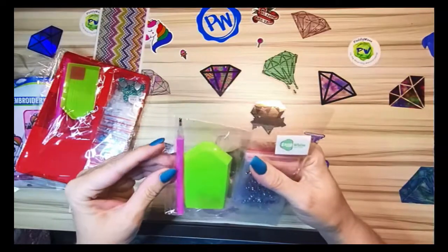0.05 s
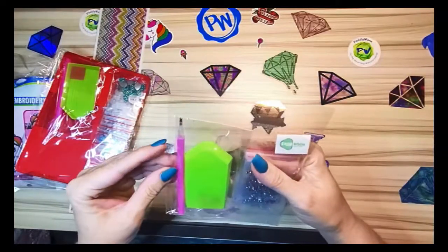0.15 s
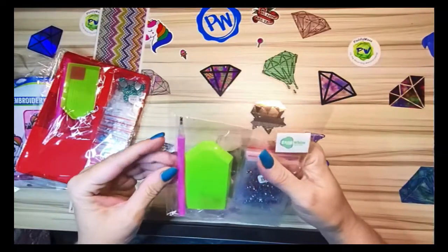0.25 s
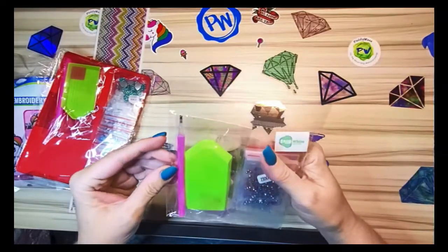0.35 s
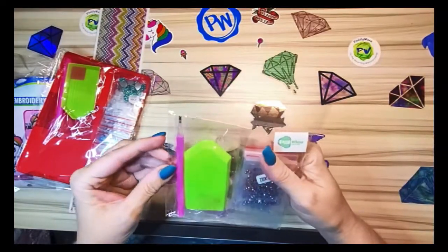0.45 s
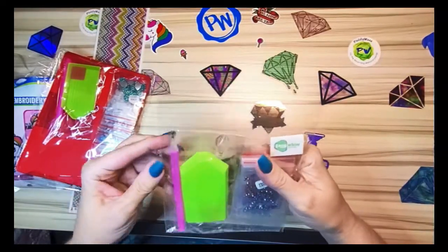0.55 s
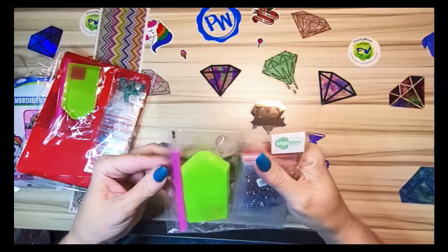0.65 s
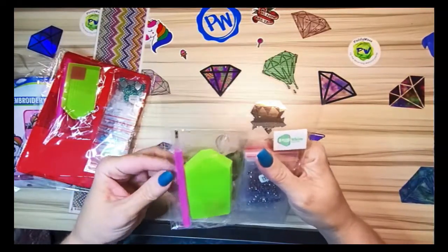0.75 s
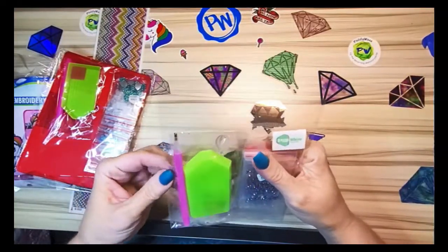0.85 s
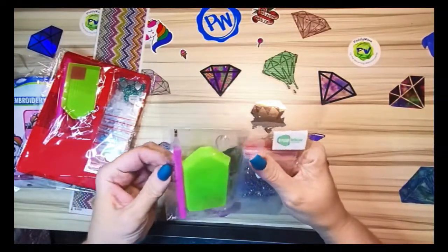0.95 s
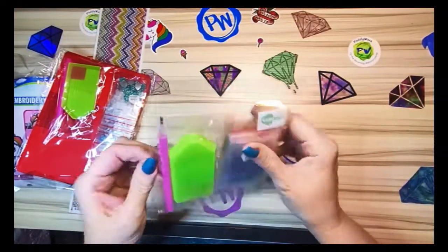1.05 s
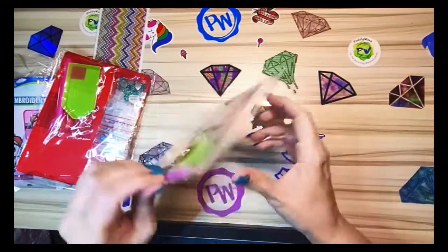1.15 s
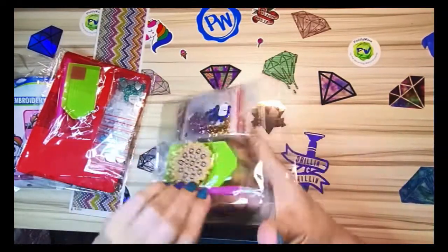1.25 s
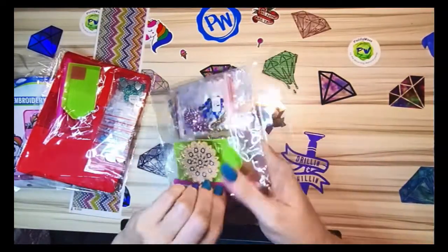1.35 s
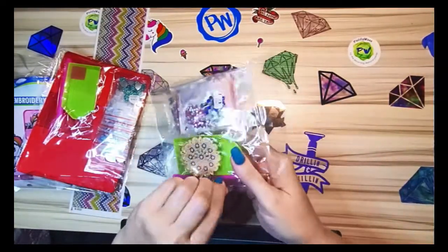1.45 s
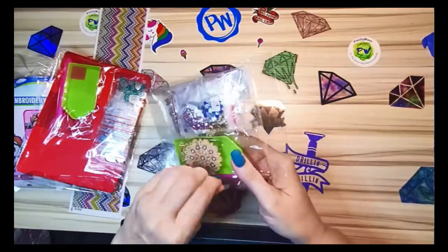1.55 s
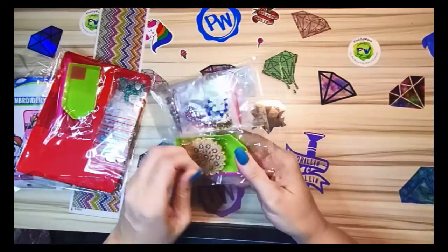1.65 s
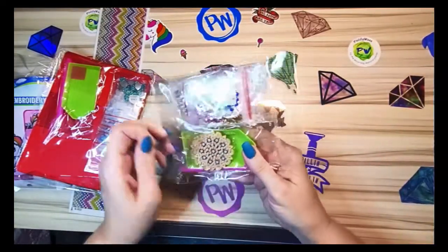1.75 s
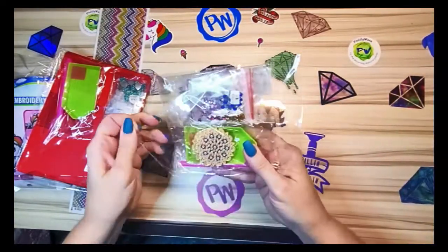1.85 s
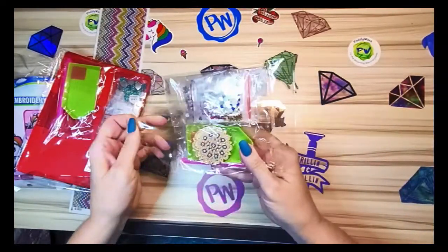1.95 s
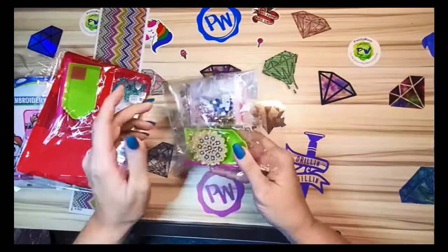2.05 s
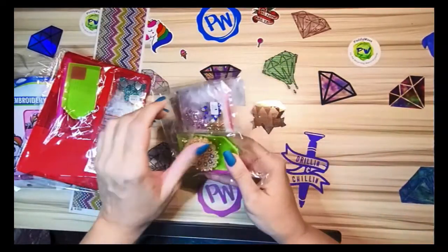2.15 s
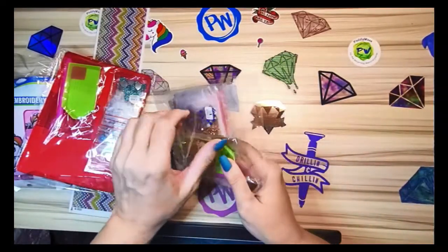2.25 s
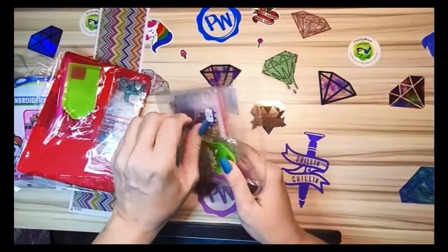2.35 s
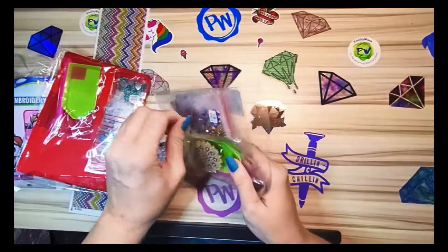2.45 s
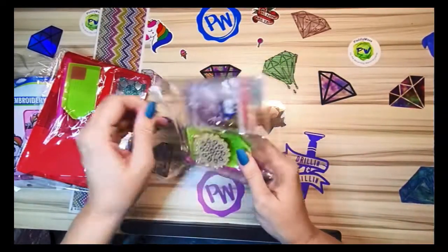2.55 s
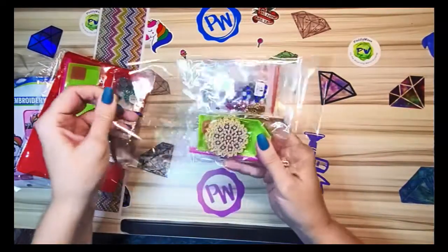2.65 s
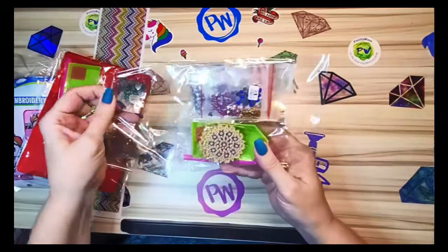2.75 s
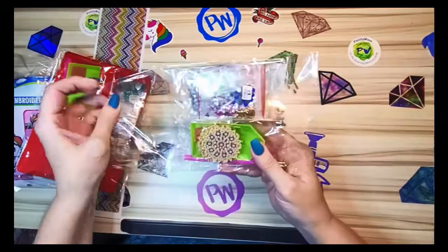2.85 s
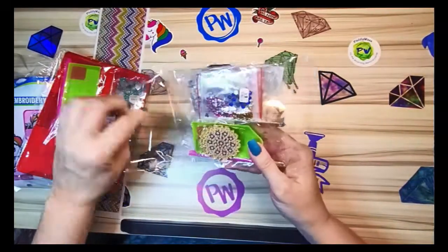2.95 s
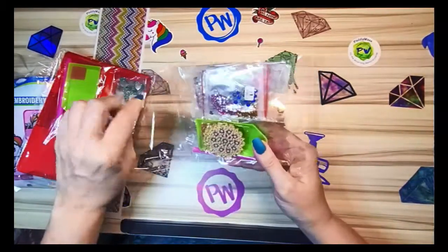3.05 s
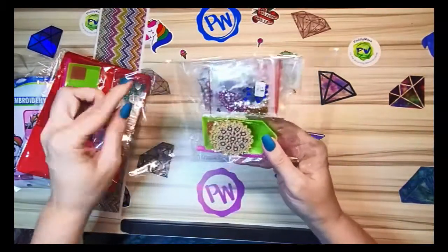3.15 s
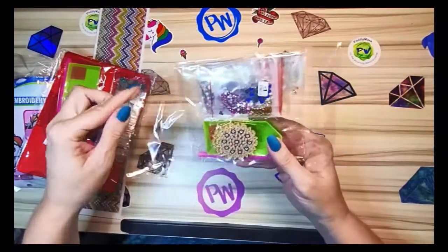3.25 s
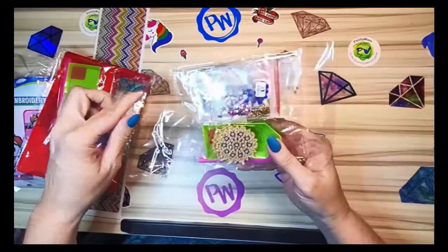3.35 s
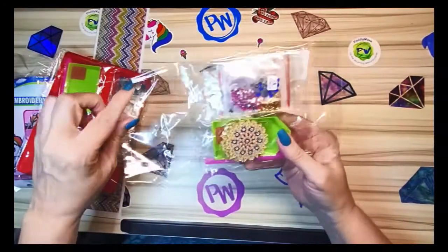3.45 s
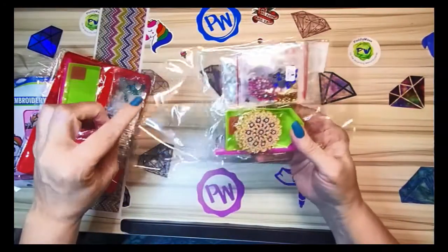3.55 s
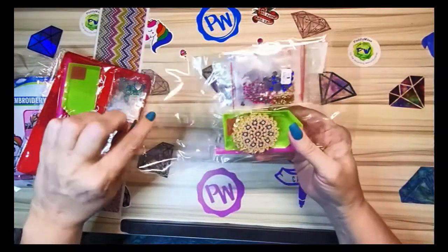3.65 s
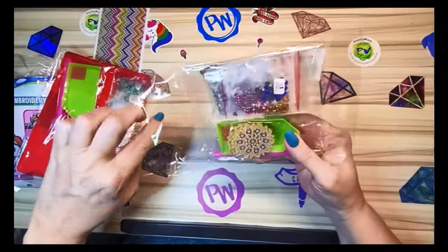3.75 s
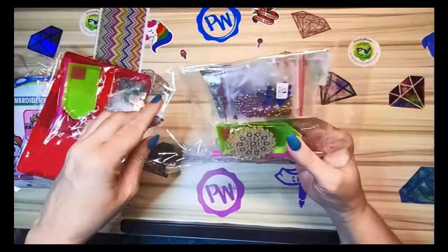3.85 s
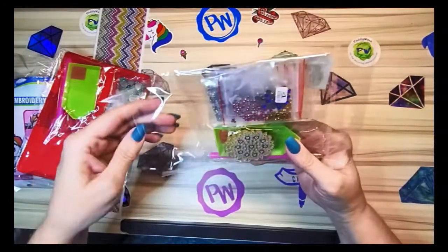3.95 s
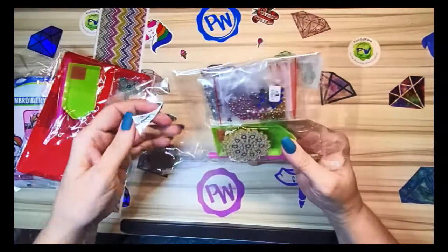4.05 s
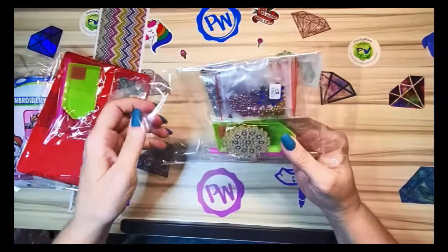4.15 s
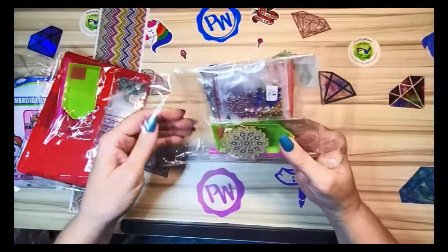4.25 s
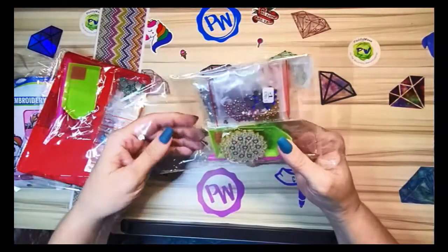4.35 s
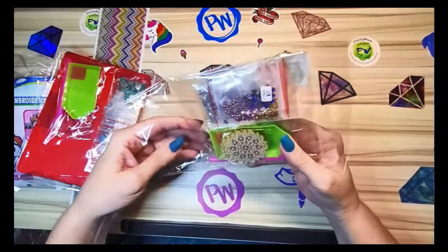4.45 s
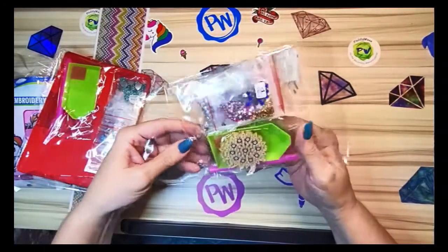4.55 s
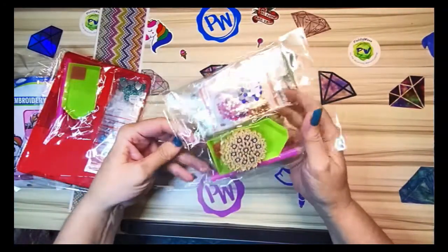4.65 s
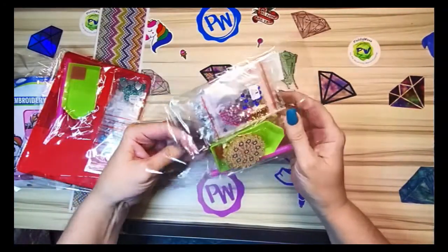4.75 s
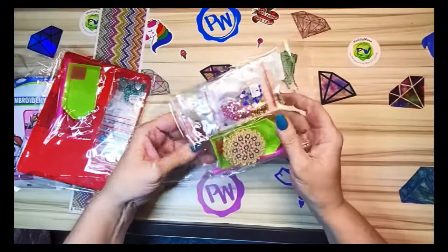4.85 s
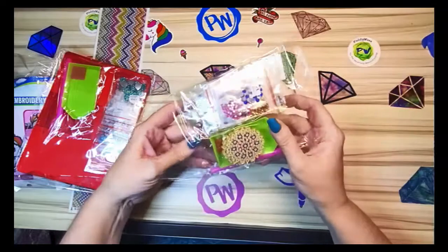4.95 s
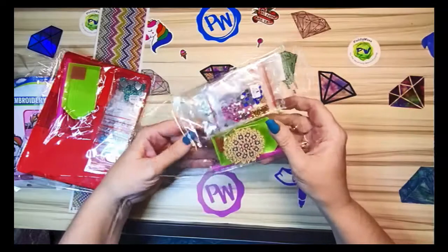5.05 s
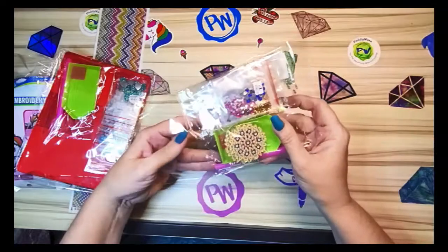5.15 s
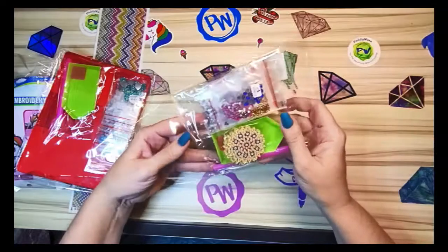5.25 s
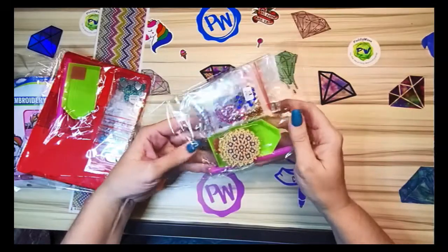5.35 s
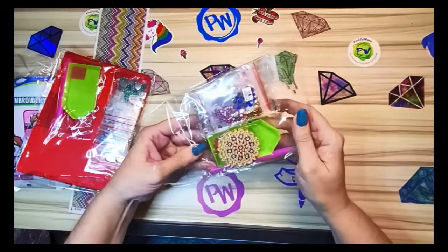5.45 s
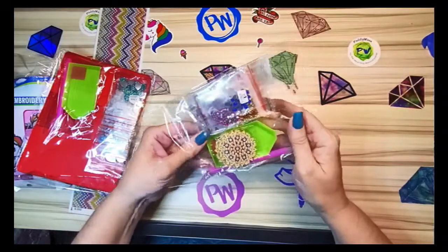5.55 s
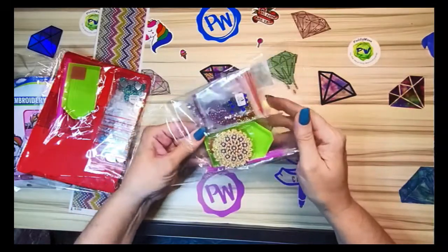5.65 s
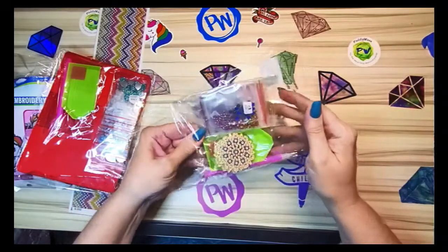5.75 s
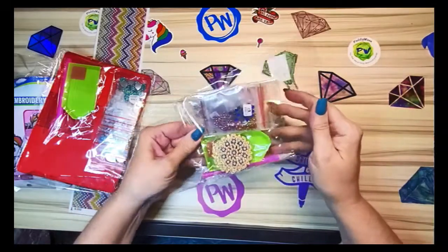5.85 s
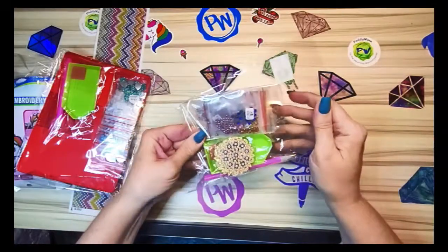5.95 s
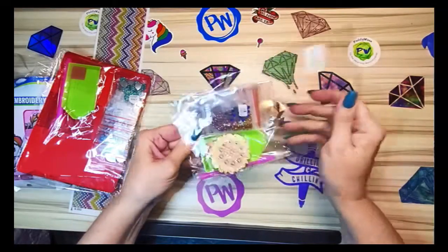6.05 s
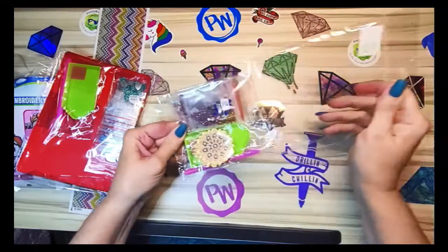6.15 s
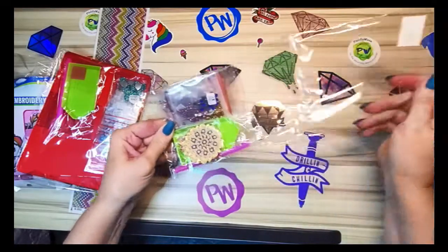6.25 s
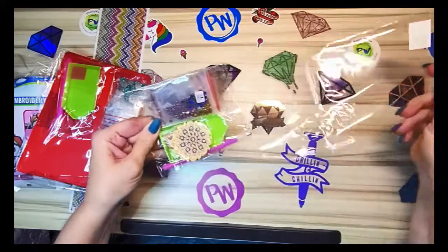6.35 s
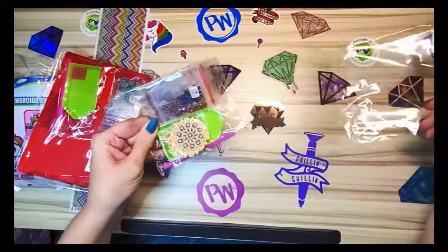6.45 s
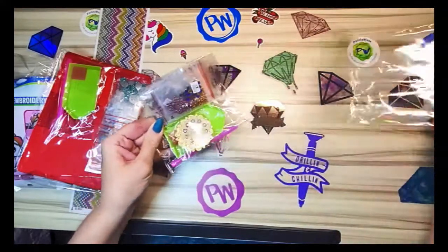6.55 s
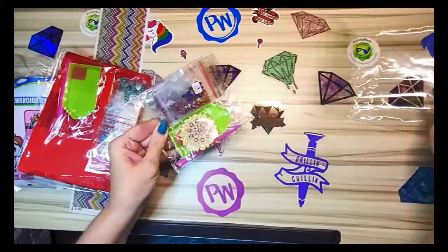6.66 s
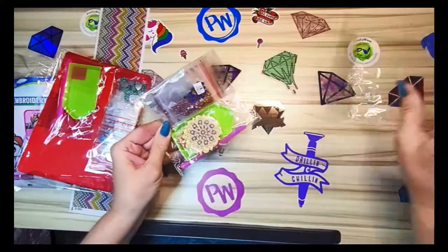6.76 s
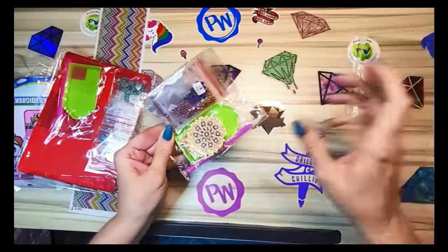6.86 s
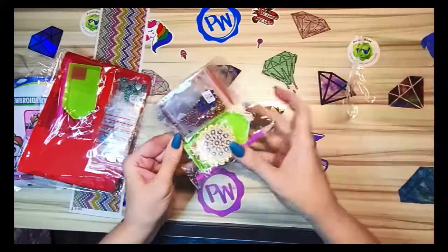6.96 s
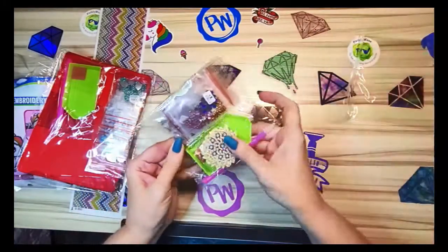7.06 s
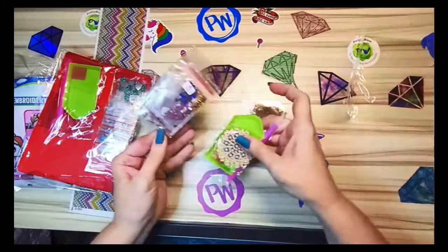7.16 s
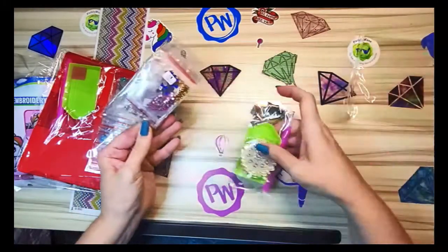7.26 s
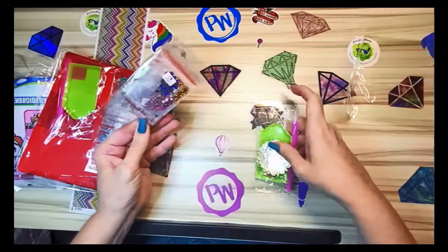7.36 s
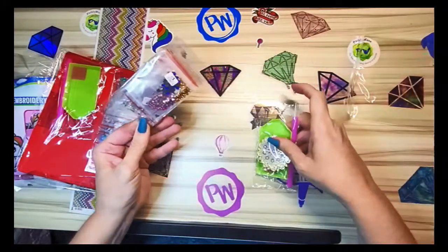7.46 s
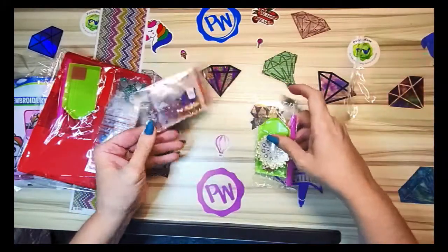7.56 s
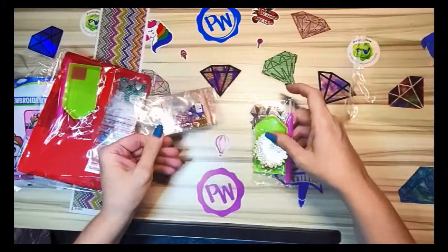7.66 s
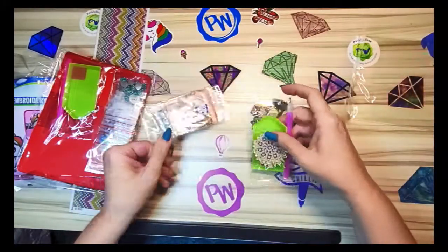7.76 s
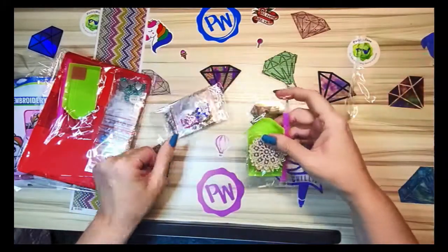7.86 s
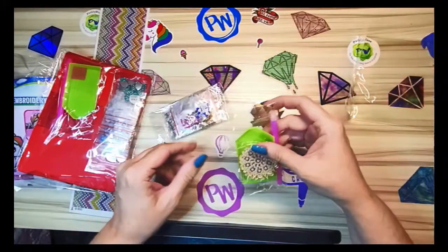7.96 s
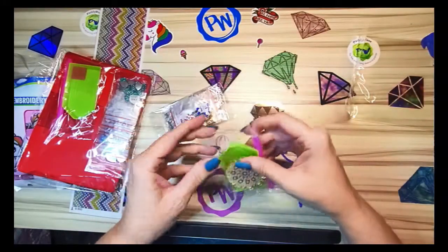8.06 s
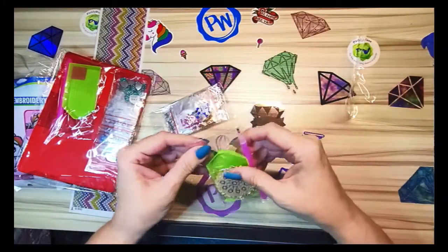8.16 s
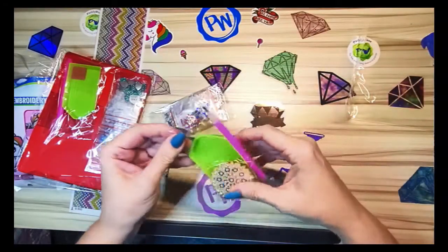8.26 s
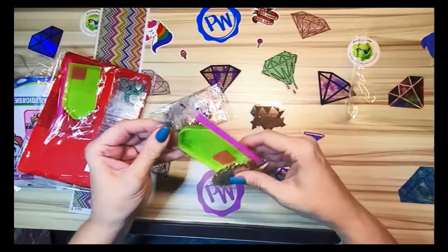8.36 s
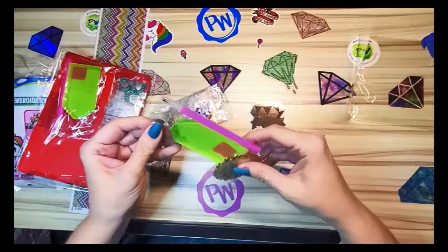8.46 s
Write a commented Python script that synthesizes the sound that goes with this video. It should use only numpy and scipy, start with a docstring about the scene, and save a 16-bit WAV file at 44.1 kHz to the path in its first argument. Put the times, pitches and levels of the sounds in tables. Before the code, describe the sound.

Bright, dry plastic crinkling heard from near the hands: single sharp pops over fine crackle and a low flutter of film. A sticky flap unpeels early in a short buzzy rip. The rustling grows almost continuous, drops away, then returns in shorter bursts with a light thud on the desk. Faint room rumble, hiss and hum lie behind.

```python
"""In a quiet room, hands unpack small craft packets over a desk, heard close up.
Creases in stiff plastic film flip as short noisy pops: sharp single snaps over a dense finer crackle and a low flutter.
An adhesive flap peels open in a quick run of slips, and soft knocks shake the modes of the desk top.
Film and flap excite noise-tail reflections; coloured noise, steady hum tones and one swelling low tone lie behind."""
import sys
import numpy as np
from scipy import signal
from scipy.fft import rfft, irfft
from scipy.io import wavfile
from scipy.ndimage import uniform_filter1d, minimum_filter1d

SR = 44100
rng = np.random.default_rng(int(sys.argv[2]) if len(sys.argv) > 2 else 0)


def dump(signal):
    """Clip the signal to [-1, 1] and save it as 16-bit WAV at the path in sys.argv[1]."""
    limited = np.clip(np.atleast_2d(signal).T, -1, 1)
    pcm = np.round(limited * 32767).astype(np.int16)
    wavfile.write(sys.argv[1], SR, pcm)


N = 374850
TIME = np.arange(N) / SR

# Larger creases that flip one by one. Each row: time in seconds, level in dB over 3 ms before a common trim,
# body (bass against treble) in dB before a common thinning.
CREASE_SNAPS = [(0.2604, -17, -2), (0.3229, -33, 8), (0.4503, -24, -3), (0.4675, -23, 2), (0.5245, -22, 6),
                (0.5351, -22, 0), (0.573, -19, 5), (0.725, -20, -1), (0.7605, -19, 1), (0.7906, -17, 1),
                (0.8062, -17, -7), (0.8445, -24, 7), (0.8874, -23, 4), (0.9619, -16, -4), (0.9727, -12, -5),
                (1.0537, -20, -2), (1.121, -32, 5), (1.1869, -25, 1), (1.2246, -20, -3), (1.2399, -8, -10),
                (1.2565, -17, 2), (1.3005, -18, 2), (1.3423, -13, -1), (1.3637, -12, -3), (1.38, -16, 3),
                (1.39, -14, 3), (1.4273, -18, 0), (1.457, -15, 2), (1.4697, -9, 2), (1.4863, -12, -5),
                (1.511, -14, -6), (1.5248, -13, -2), (1.5367, -15, -9), (1.9325, -20, -3),
                (1.9359, -12, -4), (1.9635, -15, -3), (1.9947, -19, -2), (2.0913, -33, -5),
                (2.1402, -27, -3), (2.1656, -21, -7), (2.1876, -24, -8), (2.1942, -27, -2),
                (2.2286, -23, -3), (2.2713, -27, -6), (2.2774, -20, -5), (2.3675, -27, -1),
                (2.3795, -28, 2), (2.4048, -16, 3), (2.4145, -16, -2), (2.4211, -19, 5), (2.4695, -10, -2),
                (2.4753, -8, 2), (2.4864, -12, -4), (2.4958, -11, -6), (2.5031, -9, -6), (2.5721, -11, -2),
                (2.592, -12, -3), (2.632, -18, 3), (2.7036, -17, 0), (2.7367, -16, 1), (2.8086, -12, 0),
                (2.8492, -22, -2), (2.8777, -14, -3), (2.9062, -13, -4), (2.9265, -13, 7), (2.9484, -16, 3),
                (2.9988, -12, 0), (3.0098, -15, 4), (3.0312, -17, 2), (3.0458, -16, -7), (3.108, -13, 1),
                (3.166, -20, 6), (3.2261, -17, 1), (3.2594, -13, -3), (3.3785, -13, 2), (3.5031, -18, 0),
                (3.714, -30, -8), (3.7906, -22, -5), (3.806, -18, -1), (3.8484, -14, 0), (3.8788, -18, 4),
                (3.9366, -11, 0), (3.9682, -17, -9), (4.0177, -10, 2), (4.1639, -26, -5), (4.2127, -13, -2),
                (4.253, -14, 4), (4.2697, -17, 4), (4.2916, -13, 1), (4.3166, -13, 1), (4.3701, -16, -4),
                (4.4103, -20, 0), (4.447, -11, 2), (4.4992, -11, -7), (4.5122, -11, -1), (4.5521, -14, -10),
                (4.575, -10, -2), (4.6272, -12, 0), (4.6323, -11, -3), (4.6688, -11, 2), (4.7114, -12, 2),
                (4.7268, -11, 3), (4.7611, -9, 2), (4.7702, -12, -3), (4.8106, -13, 0), (4.872, -10, 8),
                (4.938, -10, 1), (4.9503, -13, -1), (4.9761, -10, -2), (5.0035, -10, -1), (5.0376, -12, -3),
                (5.0515, -11, -3), (5.0786, -14, 1), (5.1489, -15, 2), (5.1734, -11, 0), (5.1884, -12, -1),
                (5.244, -16, 2), (5.3078, -15, -3), (5.3197, -10, -10), (5.3565, -13, -2), (5.3925, -14, 0),
                (5.4068, -15, -2), (5.4585, -19, -2), (5.4932, -16, 6), (5.5568, -12, 2), (5.5615, -14, -1),
                (5.5957, -10, -7), (5.6243, -11, -1), (5.6343, -13, 2), (5.665, -12, -12), (5.6757, -10, 2),
                (5.8319, -15, 2), (5.9007, -17, -1), (5.9639, -15, -4), (6.0019, -12, 0), (6.0248, -13, 1),
                (6.039, -11, 2), (6.0665, -12, -1), (6.1181, -15, 3), (6.1299, -14, -4), (6.1429, -11, -2),
                (6.2412, -14, -5), (6.2583, -17, -8), (6.2834, -17, 1), (6.302, -13, -6),
                (6.3491, -12, -12), (6.3619, -15, -14), (6.3674, -12, -11), (6.3788, -12, -8),
                (6.5013, -18, -11), (6.5127, -24, -8), (6.5635, -14, -2), (6.6643, -28, 8),
                (6.9452, -19, -8), (7.0129, -15, -7), (7.0279, -14, 6), (7.0559, -12, -2),
                (7.0607, -12, -6), (7.1947, -17, -7), (7.2421, -21, -10), (7.2832, -20, -2),
                (7.3253, -15, 0), (7.3315, -15, -2), (7.3395, -12, -3), (7.4179, -23, 5), (7.4675, -20, 0),
                (7.4758, -20, -5), (7.4968, -16, -2), (7.5971, -21, 4), (7.6422, -18, 2), (7.6534, -19, 1),
                (7.6996, -15, -4), (7.7353, -24, 16), (7.7589, -16, 2), (7.8026, -20, 3), (8.0618, -22, 1),
                (8.0718, -22, -8), (8.1208, -10, -1), (8.186, -16, -2), (8.2266, -10, -12),
                (8.2603, -17, -9), (8.2934, -13, -7), (8.314, -14, 2), (8.3438, -13, -6), (8.4056, -14, -4),
                (8.4134, -16, -7), (8.4925, -19, 4)]
# Finger moves that bend the film. Each row: start in seconds, hold in seconds, fine crackle in dB,
# low flutter of the whole sheet in dB, both before a common trim.
FILM_BENDS = [(0.0, 0.0043, -37, -57), (0.275, 0.005, -40, -55), (0.447, 0.008, -33, -51),
              (0.522, 0.061, -31, -48), (0.594, 0.084, -38.5, -56.5), (0.726, 0.13, -30, -49.5),
              (0.955, 0.052, -27, -44.5), (1.24, 0.056, -25, -37.5), (1.344, 0.14, -25, -45.5),
              (1.558, 0.29, -27, -54), (1.952, 0.022, -22.5, -49.5), (2.125, 0.2, -40, -72.5),
              (2.425, 0.044, -26.5, -55), (2.466, 0.14, -20, -41), (2.676, 0.18, -31, -53),
              (2.903, 0.0372, -21, -36), (3.006, 0.11, -26, -44.5), (3.161, 0.13, -30, -47.5),
              (3.389, 0.0042, -24, -36), (3.441, 0.14, -32, -52), (3.744, 0.085, -33, -48),
              (3.859, 0.093, -28, -47.5), (3.989, 0.11, -31.5, -47.5), (4.224, 0.12, -26, -42),
              (4.424, 0.16, -23, -40), (4.59, 0.2, -17, -40), (4.807, 0.28, -20, -39),
              (5.131, 0.14, -23, -40), (5.307, 0.135, -21, -45.5), (5.498, 0.15, -23, -55),
              (5.667, 0.056, -16, -41), (5.771, 0.23, -22, -47), (6.005, 0.1734, -20, -43),
              (6.256, 0.067, -24, -52.5), (6.372, 0.021, -19.5, -63), (6.444, 0.087, -35.5, -55),
              (6.551, 0.035, -25.5, -42), (6.627, 0.054, -41, -72), (6.843, 0.074, -53, -76),
              (6.97, 0.048, -29.5, -61), (7.022, 0.073, -25, -48), (7.226, 0.064, -34, -72),
              (7.331, 0.0018, -25.5, -64.5), (7.482, 0.0092, -27, -75), (7.616, 0.17, -28, -50.5),
              (8.119, 0.061, -22, -41.5), (8.244, 0.2, -25.5, -60), (8.489, 0.023, -42, -63.5)]
# Peeling the flap. Each row: time in seconds, slips per second, level in dB, body (bass against treble) in dB.
FLAP_PEEL = [(1.545, 200, -23, -6), (1.562, 300, -16, 0.5), (1.585, 400, -11.5, 1.5), (1.63, 380, -17, 1.5),
             (1.66, 400, -14.5, -4.5), (1.73, 240, -16, -2.5), (1.785, 520, -12.5, 2.5),
             (1.83, 400, -28, -14)]
# Soft knocks on the desk. Each row: time in seconds, level in dB, dullness in dB per octave.
DESK_KNOCKS = [(1.21, -47, 11), (2.225, -54, 1), (4.507, -46.5, 15), (7.801, -31.5, 2), (7.9, -50, 7)]
# Modes of the desk top. Each row: frequency in Hz, relative level in dB, 60 dB decay time in seconds.
DESK_MODES = [(91.04, -6, 0.097), (187, 3, 0.12), (271, -11, .1), (363, -4, 0.1)]
# Relative spectrum of a film crease. Each row: frequency in Hz, level in dB per Hz.
FILM_SPECTRUM = [(80, -34), (280, -25), (520, -11.5), (1400, -11), (3100, -6.5), (4300, -7.5), (6000, 0.5),
                 (7800, 1.5), (11300, -13.5), (15500, -33.5)]
# Relative spectrum of a slip of the flap. Each row: frequency in Hz, level in dB per Hz.
FLAP_SPECTRUM = [(200, -37.5), (600, -14), (1300, -21), (2300, -14), (3000, -7.5), (4400, -12), (7600, 0.5),
                 (10600, -10.5), (15500, -31)]
# Relative spectrum of the whole sheet. Each row: frequency in Hz, level in dB per Hz.
SHEET_SPECTRUM = [(50, -19.5), (280, -15.5), (550, -3), (900, -5), (2500, -16.5)]
# Relative spectrum of the room's rumble and hiss. Each row: frequency in Hz, level in dB per Hz.
ROOM_SPECTRUM = [(30, -17.5), (125, -8.5), (200, -12.5), (400, -9.5), (1200, -21), (3000, -18.5),
                 (8200, -15), (15000, -57)]
# Faint steady hum in the room. Each row: frequency in Hz, rms level in dB.
HUM_TONES = [(129, -72.5), (262, -69.5), (694, -72)]

# every bend takes up the slack quickly, is held, then the film relaxes
TAKE_UP_DB_PER_S, RELAX_DB_PER_S = 741, 310
CREASE_RING_S = 0.0021
ROOM_TONE_DB = -57.5  # rms
CUTOFF_HZ = 16000


def snaps(gain_db=0.5, thin_db=-1.5):
    """The larger creases flip one by one, each with its own weight of bass."""
    s, level_db, body_db = np.transpose(CREASE_SNAPS)
    shapes = pops(FILM_SPECTRUM, body_db + thin_db, ring_s=CREASE_RING_S, ring_db=-13, facet_hz=5510, facet_db=7.5)
    # a pop has energy 1: spread over 3 ms, this gives the level its meaning
    span = 0.003 * SR
    strength = np.sqrt(span) * from_db(level_db + gain_db)
    return place(np.round(s * SR).astype(int), shapes * strength[:, None])


def crinkle(crackle_db=-1.0, flutter_db=5.5):
    """Many small creases crackle as the film bends, over the low flutter of the whole sheet."""
    fine_db, sheet_db = handling()
    # harder handling buckles more creases a second
    fine_per_s = 520 * from_db(0.35 * (fine_db + 25))
    fine_clicks = tiny_buckles(fine_per_s, spread_db=5.2, even_s=0.035)
    flops = tiny_buckles(per_s=260, spread_db=7.0, even_s=0.042)
    fine_body_db = rng.normal(-4.5, 5.4, size=400)
    fine = pops(FILM_SPECTRUM, fine_body_db, ring_s=CREASE_RING_S, ring_db=-9.5, facet_hz=4800, facet_db=8.5)
    sheet_body_db = rng.normal(0, 1, size=200)
    sheet = pops(SHEET_SPECTRUM, sheet_body_db, ring_s=0.0029, ring_db=-10.0, facet_hz=730, facet_db=11)
    crackle = from_db(fine_db + crackle_db) * deal(fine_clicks, fine)
    flutter = from_db(sheet_db + flutter_db) * deal(flops, sheet)
    return crackle + flutter


def handling():
    """Crackle and flutter levels in dB: each bend rises, holds and relaxes; the strongest one leads."""
    t = TIME[::32]
    start, hold, fine_db, sheet_db = np.transpose(FILM_BENDS)[:, :, None]
    rise_db = TAKE_UP_DB_PER_S * np.maximum(start - t, 0)
    relax_db = RELAX_DB_PER_S * np.maximum(t - start - hold, 0)
    fade_db = rise_db + relax_db
    return [np.interp(TIME, t, np.max(db - fade_db, axis=0)) for db in (fine_db, sheet_db)]


def tiny_buckles(per_s, spread_db, even_s):
    """Creases give at random moments with uneven force, their power kept near 1 over a short while."""
    struck = rng.random(N) < per_s / SR
    clicks = struck * from_db(spread_db * np.clip(rng.standard_normal(N), -2, 2))
    width = int(even_s * SR)
    power = uniform_filter1d(uniform_filter1d(clicks ** 2, width), width)
    return clicks / np.sqrt(np.abs(power) + 1e-9)


def peel(jitter=0.25, uneven_db=2.0):
    """The glue holds and lets go in a nearly regular run of slips whose rate, level and body shift."""
    per_s, level_db, body_db = in_time(FLAP_PEEL)
    peeling = (TIME > FLAP_PEEL[0][0]) & (TIME < FLAP_PEEL[-1][0])
    progress = np.cumsum(per_s * peeling) / SR  # counted in slips
    chance = rng.standard_normal(size=(256, 2))
    marks = np.cumsum(np.exp(jitter * chance[:, 0]))
    at = np.searchsorted(progress, marks[marks < progress[-1]])
    # fewer slips a second carry more energy each, so the level holds
    strength = from_db(level_db[at] + uneven_db * chance[:len(at), 1]) * np.sqrt(SR / per_s[at])
    slips = pops(FLAP_SPECTRUM, body_db[at], ring_s=0.0017, ring_db=-10.0, facet_hz=6440, facet_db=-5, body_hz=5600)
    return place(at, strength[:, None] * slips)


def pops(spectrum, body_db, ring_s, ring_db, facet_hz, facet_db, body_hz=3000, flip_s=0.0003, size=512):
    """One pop a row, energy 1: a facet starts to give, flips with a sharp kick, then shivers for a moment."""
    t, hz = np.arange(size) / SR, np.fft.rfftfreq(size, 1 / SR)
    chance = rng.standard_normal((len(body_db), size))
    shiver = from_db(ring_db + 2.3 * chance[:, :1]) * chance * np.exp(-t / ring_s)
    kick = (np.arange(size) == int(flip_s * SR)) * np.sign(chance[:, 1:2])
    # every facet has two broad resonances and a hollow of its own; a negative facet_db swaps peaks and dips
    octaves = np.log2((hz + 1) / facet_hz)
    offsets = 0.8 * chance.T[2:5, :, None]
    first, second, hollow = np.exp(-((octaves - offsets) / 0.33) ** 2)
    facet = np.maximum(first, second) - hollow
    # large facets push more bass
    body = np.asarray(body_db)[:, None] / (1 + (hz / body_hz) ** 4)
    colour_db = at_hz(spectrum, hz) + facet_db * facet + body
    return rms_one(coloured(kick + shiver, colour_db)) / np.sqrt(size)


def desk(settle_s=0.019):
    """A packet lands unevenly, shaking the desk top's modes while it settles."""
    out, t = np.zeros(N), TIME[:SR // 2]
    reference_hz = DESK_MODES[1][0]
    for s, level_db, dull_db in DESK_KNOCKS:
        at = round(s * SR)
        force = rng.standard_normal(len(t)) * np.exp(-t / settle_s)
        for hz, db, t60 in DESK_MODES:
            mode = np.exp(-np.log(1000) * t / t60) * np.cos(2 * np.pi * hz * t)
            ringing = signal.fftconvolve(force, mode)[:len(t)]
            # a dull knock tilts the modes down toward the treble
            mode_db = level_db + db - dull_db * np.log2(hz / reference_hz)
            out[at:at + len(t)] += from_db(mode_db) * ringing / np.abs(ringing).max()
    return out


def room(x, t60=0.18, wet_db=-9.0, first_s=0.0064, count=6):
    """A small furnished room: dense decaying reflections that change as the hands move from place to place."""
    t = TIME[:SR // 4]
    decay = np.exp(-np.log(1000) * t / t60)
    build_up = np.clip(t / first_s, 0, 1) ** 2
    tails = rng.standard_normal((count, len(t))) * decay * build_up
    tails = from_db(wet_db) * rms_one(tails) / np.sqrt(len(t))
    # one place fades into the next, all of them in turn every 2 s
    turn = TIME / 2 + np.arange(count)[:, None] / count
    nearness = np.maximum(np.cos(2 * np.pi * turn), 0) ** 2
    nearness /= np.linalg.norm(nearness, axis=0)
    return x + signal.fftconvolve(x * nearness, tails, axes=1).sum(axis=0)[:N]


def room_tone():
    """Faint steady rumble and hiss from coloured noise, with pure tones as hum."""
    hz = np.fft.rfftfreq(N, 1 / SR)
    hum = sum(from_db(db) * np.sqrt(2) * np.sin(2 * np.pi * tone_hz * TIME) for tone_hz, db in HUM_TONES)
    noise = rms_one(coloured(rng.standard_normal(N), at_hz(ROOM_SPECTRUM, hz)))
    return hum + from_db(ROOM_TONE_DB) * noise


def low_tone(hz=258, level_db=-58, peak_s=0.9, width_s=0.11):
    """A faint low sine swells and fades once in the background."""
    swell = np.exp(-((TIME - peak_s) / width_s) ** 2)
    return from_db(level_db) * np.sqrt(2) * np.sin(2 * np.pi * hz * TIME) * swell


def from_db(db):
    """Decibels to gain."""
    return 10 ** (np.asarray(db) / 20)


def rms_one(x):
    """Scale to rms 1 along time."""
    return x / np.sqrt(np.mean(x ** 2, axis=-1, keepdims=True) + 1e-20)


def in_time(rows):
    """Each column of a curve at every sample."""
    s, *columns = np.transpose(rows)
    return [np.interp(TIME, s, c) for c in columns]


def at_hz(points, hz):
    """Read a spectrum in dB on a log-frequency axis."""
    knots, db = np.transpose(points)
    return np.interp(np.log(hz + 1), np.log(knots), db)


def coloured(x, db):
    """Causal (minimum-phase) filter with the given dB at each frequency bin."""
    size = x.shape[-1]
    cepstrum = irfft(np.log(from_db(db)), size)
    # folding the cepstrum forward in time makes the filter causal
    cepstrum[..., 1:size // 2] *= 2
    cepstrum[..., size // 2 + 1:] = 0
    return irfft(rfft(x) * np.exp(rfft(cepstrum)), size)


def deal(clicks, shapes):
    """Every click plays one of the pops, picked at random."""
    at = np.flatnonzero(clicks)
    picked = shapes[rng.integers(0, len(shapes), len(at))]
    return place(at, clicks[at, None] * picked)


def place(at, played):
    """Add each row of sound at its own sample."""
    samples = at[:, None] + np.arange(played.shape[1])
    return np.bincount(samples.ravel(), played.ravel(), N)[:N]


def scene():
    """Film and flap sound in the room; the desk, room tone and low tone are added without reflections."""
    handled = room(snaps() + crinkle() + peel())
    return (handled + desk() + room_tone() + low_tone())[None]


def record(dry):
    """A fast limiter eases down peaks above full scale, then a steep low-pass cuts the top."""
    needed = 1 / np.maximum(np.abs(dry), 1)
    gain = uniform_filter1d(minimum_filter1d(needed, size=25), size=25)
    low_pass = signal.ellip(10, 0.2, 80, CUTOFF_HZ, fs=SR, output="sos")
    return signal.sosfilt(low_pass, dry * gain)


dry = scene()
out = record(dry)
dump(out)
```